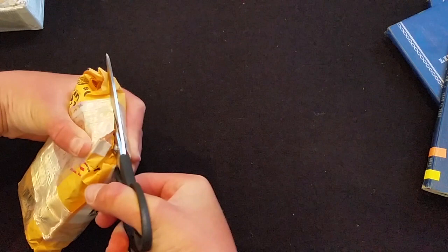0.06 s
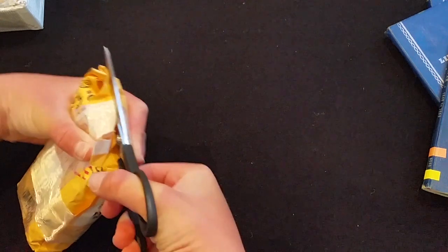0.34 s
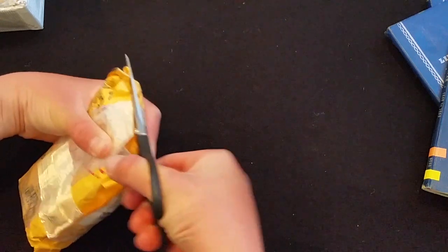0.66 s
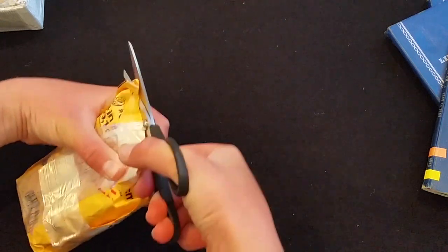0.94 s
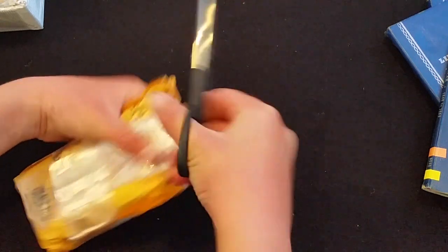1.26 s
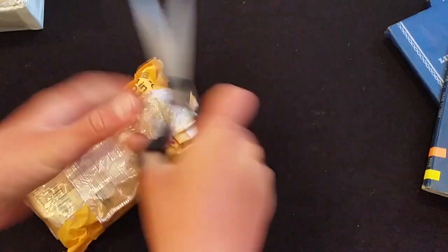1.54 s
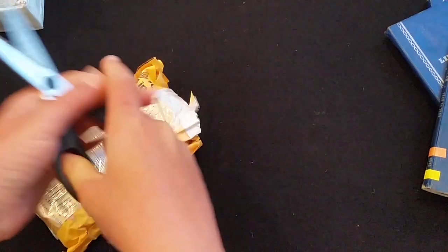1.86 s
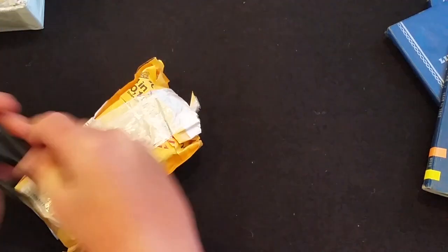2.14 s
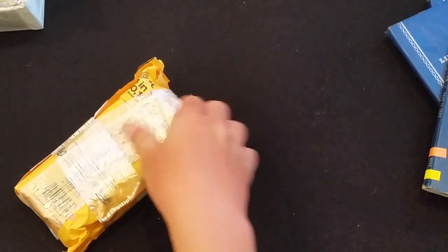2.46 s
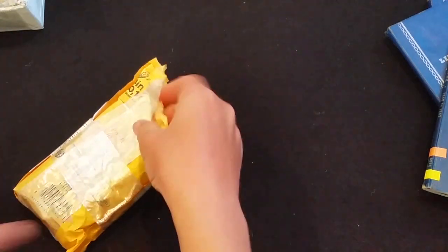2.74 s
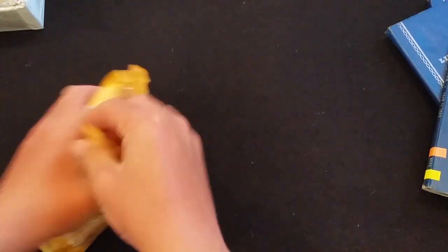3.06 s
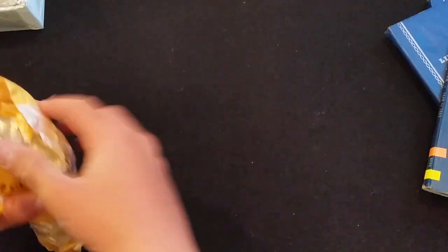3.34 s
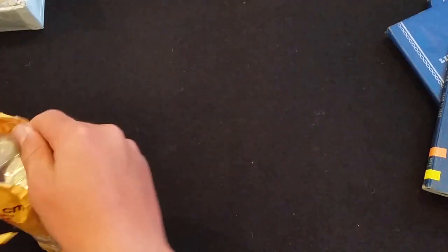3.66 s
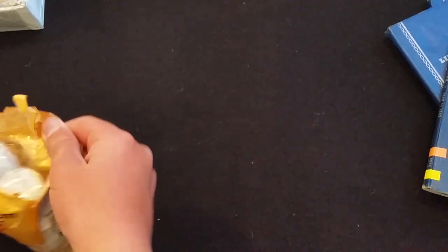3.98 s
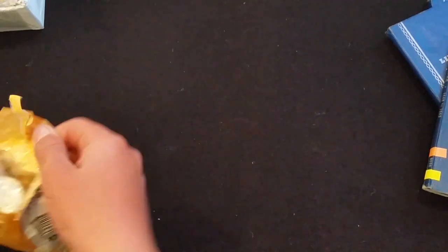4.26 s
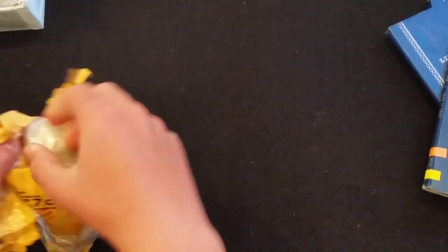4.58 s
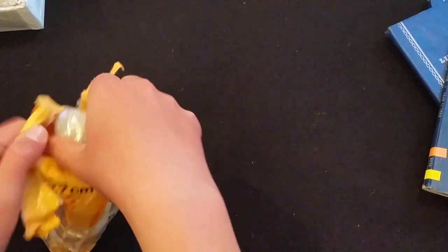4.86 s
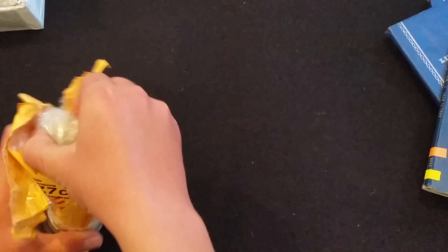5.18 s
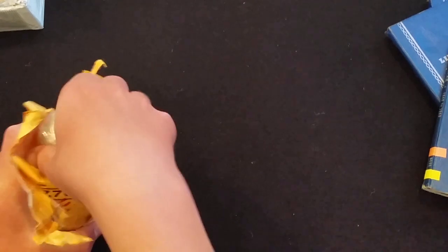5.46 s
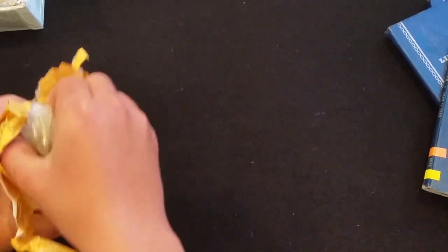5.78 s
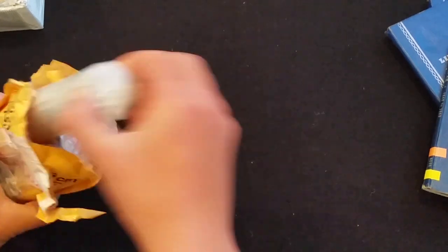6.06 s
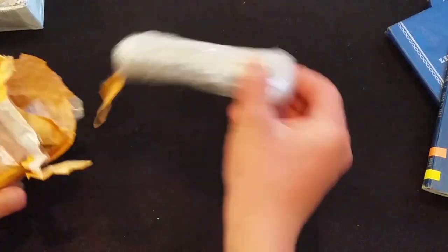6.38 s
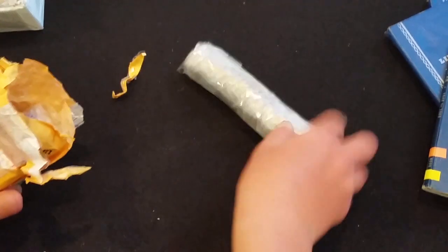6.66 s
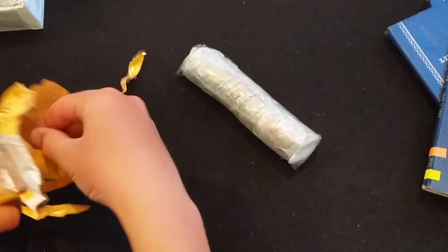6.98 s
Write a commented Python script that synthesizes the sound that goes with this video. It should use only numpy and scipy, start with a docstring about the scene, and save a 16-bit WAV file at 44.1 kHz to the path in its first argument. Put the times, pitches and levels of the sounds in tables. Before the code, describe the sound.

A packet is cut with scissors and ripped open, its paper and plastic crackling and snapping between dull bumps on a table.

```python
"""At a cloth-covered table in a small room, scissors cut a paper and plastic wrapper; hands tear it open
and lay down a wrapped roll. Creases buckle and release elastic energy as crackles and snaps, brightest
on the right. Blows and friction excite the table's modes, and this structure-borne sound reaches mainly
the left microphone, whose mount sways after heavy blows. Faint hiss and rumble lie underneath."""
import sys
import numpy as np
from scipy import signal
from scipy.fft import rfft, irfft, next_fast_len
from scipy.io import wavfile
from scipy.ndimage import uniform_filter1d, minimum_filter1d

SR = 44100
rng = np.random.default_rng(int(sys.argv[2]) if len(sys.argv) > 2 else 0)


def wav_record(signal):
    """Record a signal, one row per channel, as 16-bit PCM in the file named by sys.argv[1]."""
    frames = np.transpose(np.atleast_2d(signal))
    bounded = np.clip(frames, -1, 1)
    # unit amplitude maps onto the largest positive 16-bit level
    quanta = np.round(bounded * 32767).astype(np.int16)
    wavfile.write(sys.argv[1], SR, quanta)


N = 313974

# Noise density of the left and right channels: f/Hz, level/dB
HISS_LEFT = [(10, -57), (30, -55.5), (55, -63.5), (90, -81), (300, -80), (1200, -86.5), (1700, -81.5),
             (2200, -93.5), (2700, -90.5), (3450, -104), (4050, -80), (4900, -75), (5600, -80),
             (6400, -108), (16000, -114)]
HISS_RIGHT = [(10, -105), (55, -79), (90, -80), (250, -81), (600, -92.5), (1700, -97), (3300, -106),
              (4800, -105), (7000, -114), (16000, -110)]
# Arms shifting on the table, as when the scissors are put away: peak t/s, swell/s, fade/s, level/dB
ARM_SHIFTS = [(.55, .8, 1.5, -37), (1.75, 0.83, 1.4, -32.5), (7.05, 1, 0.55, -28.5)]
# Swings of the microphone mount: t/s, relative peak level/dB
MOUNT_SWAYS = [(1.188, -29), (1.408, -8), (1.528, -6), (2.059, -9), (4.223, -24), (5.021, -23), (5.42, -23),
               (6.616, -3), (6.779, -13.5)]
# Hands and packet sliding on the cloth: peak t/s, swell/s, fade/s, relative level/dB
SLIDES = [(.37, .2, 0.13, -55), (.52, 0.013, 0.018, -44), (1.19, .3, 0.21, -44), (1.37, 0.082, 0.3, -42),
          (2.6, 0.042, 0.17, -44), (2.768, 0.013, 0.12, -44), (3.28, 0.14, 0.28, -40),
          (3.37, 0.11, 0.079, -44), (3.85, 0.68, 0.15, -52), (4.6, 0.24, 0.45, -56),
          (5.015, 0.048, 0.15, -38), (5.7, 0.17, 0.055, -37.5), (6.01, 0.12, 0.4, -40.5),
          (6.33, 0.67, 0.76, -45.5), (7.08, 0.6, 0.26, -49.5)]
# Normal modes of the table top: f/Hz, relative level/dB, T60/s
TABLE_MODES = [(47.7, -8.5, 0.33), (67.3, -6, 0.33), (113.5, -12, 0.27), (146.4, -10, 0.22),
               (163.2, -3.5, 0.2), (196.5, -6, 0.25), (294.7, -4.5, 0.19), (326.6, -3, 0.12),
               (359, -3, 0.21), (390, -9, 0.15), (482, -12, 0.18), (530, -7, .14), (630, -11.5, 0.05),
               (758.6, -4.5, 0.048), (846, -11, 0.078), (1036, -8.5, 0.034)]
# Spectrum of the table's dense, well damped modes: f/Hz, relative level/dB
THUD_SPECTRUM = [(40, 2), (150, 7.5), (350, 1), (900, -0.5), (1300, -13.5), (2000, -29.5), (3200, -35.5),
                 (6000, -52.5)]
# Blows on the table: t/s, level before panning/dB, bass weight/dB, hardness/dB, favoured f/Hz
KNOCKS = [(0.52, -54, 6, 6, 734), (1.408, -36.5, -1, -4, 450), (1.53, -39, -4.5, -2.5, 376),
          (2.067, -40, -9, -1, 297), (2.072, -29.5, -4.5, -4.5, 280), (2.088, -37.5, -3, -21, 167),
          (2.114, -34, -7, 5, 450), (2.601, -45, 9, -18, 204), (2.756, -49, -14, 5, 740),
          (3.953, -38.5, -7, -3.5, 323), (4.158, -30.5, -11, -1.5, 505), (4.887, -58, -12, 11, 1200),
          (5.016, -47.5, -4, -14, 226), (5.38, -27, -6.5, 1.5, 310), (5.4, -26, 28.5, 7.5, 114.5),
          (5.428, -24, -7, -0.5, 320), (5.486, -37.5, 12, -2, 166), (5.966, -53.5, -10, 14, 1400),
          (6.002, -51, -13, -13, 337), (6.596, -41, -1, -13, 346), (6.631, -26, 4.5, -2, 286),
          (6.651, -33.5, 0.5, -17, 168), (6.688, -33.5, 1, -3.5, 328), (6.756, -43.5, 5.5, -20, 392)]
# The blades meeting through the last folds: t/s, peak level/dB
SNIPS = [(0.522, -31), (1.1501, -19)]
# Pulls that rip the film: peak t/s, swell/s, fade/s, level/dB
TEARS = [(3.565, .1, 0.13, -37.5), (3.83, 0.22, 0.37, -36), (4.125, 0.14, 0.1, -36),
         (4.205, 0.14, 0.029, -30.5)]
# Cuts, bends and pulls: peak t/s, swell/s, fade/s, relative film level/dB, relative paper level/dB
BENDS = [(.025, 0.29, 0.25, -46.5, -51), (.258, 0.035, 0.025, -38.5, -45), (.39, 0.11, 0.32, -44.5, -56),
         (.52, 0.011, 0.056, -36, -45.5), (.61, 0.13, 0.23, -48, -64), (.915, 0.055, 0.1, -30.5, -45),
         (1.169, 0.054, 0.079, -32, -39.5), (1.4, 0.098, 0.074, -39.5, -45.5),
         (1.488, 0.067, 0.068, -38.5, -47.5), (2.17, 0.082, 0.15, -64, -61), (2.61, 0.017, 0.076, -46, -57),
         (2.765, 0.082, 0.13, -43, -51.5), (2.9, 0.16, 0.15, -38, -43.5),
         (3.095, 0.045, 0.056, -39.5, -45.5), (3.27, 0.34, 0.14, -42, -50), (3.555, .13, 0.073, -36, -47),
         (3.83, 0.75, 0.17, -44, -50.5), (3.942, 0.076, 0.086, -35, -42), (4.088, 0.07, 0.18, -32, -41),
         (4.41, .15, 0.11, -43.5, -54), (4.66, 0.38, 0.7, -44.5, -51.5), (4.92, 0.12, 0.17, -43.5, -57),
         (5.02, 0.11, 0.099, -36, -41.5), (5.135, 0.24, 0.22, -41.5, -50), (5.39, 0.2, 0.66, -46.5, -54),
         (5.68, 0.12, 0.085, -43.5, -49.5), (6.02, 0.2, .3, -39, -42), (6.275, 0.15, 0.12, -41, -44.5),
         (6.46, 0.27, 0.22, -49.5, -54), (6.621, 0.015, 0.026, -27.5, -41), (6.67, 0.035, 0.16, -37, -43),
         (6.82, 0.27, 0.57, -55, -59), (7.06, 0.077, .3, -55, -53)]
# Spans in which a hand holds the packet: start t/s, end t/s
HELD_SPANS = [(0, 1.7), (2.61, 8)]
# Sharp snaps: creases giving way, and the click of the scissors being put down:
# t/s, relative crack level/dB, crack f/Hz, relative tick level/dB
SNAPS = [(.521, -15, 10200, -22.5), (.9545, -15.5, 11300, -35), (1.1501, -7.5, 9600, -19),
         (2.1144, -34, 10900, -40), (2.79, -42, 13700, -28), (2.8152, -20, 11300, -26.5),
         (2.901, -24, 11600, -21), (3.044, -26, 12600, -35), (3.092, -22, 10900, -27.5),
         (3.1939, -19, 9800, -47), (3.417, -43, 14500, -52), (3.5667, -16, 12000, -50),
         (3.8104, -18, 12400, -34), (3.8424, -21.5, 10900, -27), (3.9197, -16.5, 11000, -30),
         (3.943, -18, 13000, -21), (4.0695, -19, 13600, -26), (4.0976, -11, 9700, -40),
         (4.3068, -26, 11180, -38), (4.3233, -20.5, 10000, -36), (4.4181, -17.5, 14000, -51),
         (4.563, -31, 10100, -26.5), (4.74, -25, 12100, -30.5), (4.8338, -21, 10140, -50),
         (4.8487, -17.5, 10600, -45), (5.0164, -18, 11700, -16.5), (5.0236, -16, 11500, -24),
         (5.367, -19.5, 10800, -29), (5.913, -24.5, 10600, -32), (5.9665, -31, 10300, -19.5),
         (6.0045, -7.5, 11100, -21.5), (6.0215, -24, 11700, -26), (6.0496, -19, 10300, -45),
         (6.1808, -11, 13000, -35), (6.2602, -22, 11900, -51), (6.2977, -27, 10500, -27.5),
         (6.6286, -19, 9140, -25), (6.667, -15, 10100, -34), (6.719, -25, 11900, -31),
         (7.061, -29, 13900, -29)]
# Spectra of the blades and the wrapper: f/Hz, relative level/dB
BITE_SPECTRUM = [(300, -10), (1000, 0), (1500, -5), (2100, 9), (2800, -7), (3800, 2), (5000, -8),
                 (6200, -22), (9000, -31)]  # blades meeting
RIP_SPECTRUM = [(4000, -39), (7500, -8), (9500, 3), (12000, -9.5), (14500, 2), (16000, -14)]  # film ripping
FILM_SPECTRUM = [(3000, -44), (6800, -17.5), (8000, -7.5), (9400, 4.5), (11500, 2), (13500, 0.5),
                 (15500, -2.5), (17000, -48)]  # film crackling
PAPER_SPECTRUM = [(100, -15.5), (300, -0.5), (900, 0.5), (1700, 0), (2500, -2), (3200, -8.5), (4200, -1.5),
                  (6000, -7), (9000, -56)]  # paper rustling
CRACK_SPECTRUM = [(2000, -54), (4500, -31.5), (6800, -16), (9000, 2), (11500, 1), (13500, 1), (16000, -8)]  # one loud crack of film
TICK_SPECTRUM = [(150, -7.5), (500, -3.5), (950, 8), (1400, -2), (2000, -3.5), (2900, -11.5), (3900, -7),
                 (5200, -9), (7000, -29.5)]  # one tick of stiff paper
# Response to the film at the left microphone, relative to the right: f/Hz, gain/dB
OFF_AXIS_RESPONSE = [(4000, 25), (7000, -2), (9500, -23.5), (11500, -14.5), (13500, -6), (15500, 7)]

FILM_RING_S, PAPER_RING_S = .00045, .0013  # decay time constants of a crease


def amp(db):
    """Amplitude ratio of a level in decibels."""
    return 10 ** (np.asarray(db) / 20)


def unit(x):
    """Normalisation to unit rms."""
    return x / np.sqrt(np.mean(x ** 2) + 1e-20)


def level_at(spectrum, hz):
    """Interpolation of (f/Hz, level/dB) points on a logarithmic frequency axis."""
    f, db = np.transpose(spectrum)
    return np.interp(np.log(hz + 1), np.log(f + 1), db)


def colour(x, spectrum):
    """Minimum-phase filter: the phase follows from the Hilbert transform of the log gain."""
    size = next_fast_len(x.shape[-1] + 4096)
    log_gain = level_at(spectrum, abs(np.fft.fftfreq(size, 1 / SR))) * np.log(10) / 20
    response = np.exp(np.conj(signal.hilbert(log_gain)))[:size // 2 + 1]
    return irfft(rfft(x, size) * response, size)[..., :x.shape[-1]]


def add(mix, start_s, sound):
    """Superposition of a sound on the mix, in place."""
    part = mix[:, max(round(start_s * SR), 0):][:, :sound.shape[-1]]
    part += sound[..., :part.shape[-1]]


def swell(peak_s, swell_s, fade_s, db, range_db=20.5):
    """Exponential growth and decay, covering range_db in each of swell_s and fade_s."""
    t = np.arange(N) / SR - peak_s
    return amp(db - range_db * np.minimum(np.maximum(-t / swell_s, t / fade_s), 10))


def gestures(rows):
    """Incoherent addition: overlapping swells sum in power."""
    return np.sqrt(sum(swell(*row) ** 2 for row in rows))


def wander(corner_hz):
    """Random modulation: low-passed noise of unit rms."""
    lowpass = 1 / (1 + (np.fft.rfftfreq(N, 1 / SR) / corner_hz) ** 4)
    return unit(irfft(rfft(rng.standard_normal(N)) * lowpass, N))


def slips(per_s, spread_db):
    """Poisson process of impulses: many small, a few large."""
    size = amp(spread_db * np.minimum(rng.exponential(1, N), 4))
    return size * rng.choice([-1, 1], N) * (rng.random(N) < per_s / SR)


def background():
    """Noise floor: steady channel hiss, and structure-borne rumble from arms leaning on the table."""
    left, right = rng.standard_normal((2, N)) * np.sqrt(SR / 2)  # unit power per hertz
    hiss = np.array([colour(left, HISS_LEFT), colour(right, HISS_RIGHT)])
    rumble_spectrum = [(8, -20), (27, 5.5), (40, -15), (62, -11), (100, -33), (300, -59)]
    rumble = unit(colour(rng.standard_normal((2, N)), rumble_spectrum))
    leaning = np.hypot(amp(-54), gestures(ARM_SHIFTS))
    return hiss + rumble * leaning * amp([[0], [-13]])


def room(x, t60, wet_db):
    """Reverberation: sparse, exponentially decaying reflections follow the direct sound."""
    t = np.arange(SR // 2) / SR
    taps = rng.standard_normal((2, len(t))) * (rng.random((2, len(t))) < 3000 / SR)
    taps *= (t > .003) * amp(-60 * t / t60)
    taps /= np.linalg.norm(taps, axis=1, keepdims=True)
    return x + amp(wet_db) * signal.fftconvolve(x, taps, axes=1)[:, :N]


def mount_sway(hz=28.24, rise_s=0.035, t60=0.46):
    """Damped oscillator: the springy microphone mount swings below the table's lowest mode."""
    out, t = np.zeros((2, N)), np.arange(SR) / SR
    swing = np.sin(2 * np.pi * hz * t) * (1 - np.exp(-(t / rise_s) ** 3)) * amp(-60 * t / t60)
    for s, db in MOUNT_SWAYS:
        add(out, s, amp(db) * swing / abs(swing).max() * amp([[-1], [-28]]))
    return out


def table_ring(drive, scatter_db):
    """Modal superposition: damped sinusoids weighted by the spectrum of the driving force."""
    t = np.arange(SR // 2) / SR
    hz, db, t60 = np.transpose(TABLE_MODES)[:, :, None]
    share = amp(db + level_at(drive, hz) + scatter_db * rng.standard_normal(hz.shape))
    share *= rng.choice([-1, 1], hz.shape)
    return (share * amp(-60 * t / t60) * np.sin(2 * np.pi * hz * t)).sum(0)


def sliding():
    """Stick-slip friction: small slips on the cloth drive the table's modes to a murmur."""
    grit = np.array([slips(1500, spread_db=3.5), slips(1700, spread_db=3)])
    modes = table_ring([(60, -2), (150, -6.5), (330, 3), (500, -2), (900, 3)], scatter_db=0.5)
    ring = signal.oaconvolve(grit[0], modes)[:N]
    rub = unit(ring) * amp([[2], [-11]]) + unit(colour(grit, THUD_SPECTRUM)) * amp([[-1], [-6]])
    return rub * gestures(SLIDES)


def knocks(thud_t60=0.072, attack_s=0.00029, light_db=-47, heavy_db=-39):
    """Impact excitation: each blow rings the table, and its dense, well damped modes give a thud."""
    out, t = np.zeros((2, N)), np.arange(SR // 2) / SR
    for s, db, weight_db, hardness_db, note_hz in KNOCKS:
        drive = [(130, weight_db), (290, 0), (500, 0), (850, hardness_db)]
        burst = rng.standard_normal((2, len(t))) * amp(-60 * t / thud_t60)
        thud = unit(colour(colour(burst, THUD_SPECTRUM), drive))
        ring = unit(table_ring(drive, scatter_db=1))
        blow = (ring + amp(-4) * thud) * (1 - np.exp(-t / attack_s))
        # the point of impact favours the modes near one note
        blow = unit(colour(blow, [(note_hz / 1.07, 0), (note_hz, 6), (note_hz * 1.26, 0)]))
        # light taps reach both sides by air; heavy blows pass through the table to the left
        left_db = np.interp(db, [light_db, heavy_db], [-1, 19.5])
        sides = 2 * amp([[left_db], [0]]) / (1 + amp(left_db))
        add(out, s, amp(db) * sides * blow)
    return out


def crease(hz, ring_s, ring_db):
    """Buckling transient: a decaying noise burst of unit energy with one resonance."""
    t = np.arange(512) / SR
    burst = rng.standard_normal((2, len(t))) * np.exp(-t / ring_s)
    burst = colour(burst, [(hz / 1.2, 0), (hz, ring_db), (hz * 1.2, 0)])
    return burst / np.linalg.norm(burst, axis=1, keepdims=True)


def crackle(low_hz, high_hz, per_s, spread_db, ring_s, clump_db, count=14):
    """Shot noise: creases slip independently, and a fluctuating gain groups them into clumps."""
    grains = np.zeros((2, N))
    for hz in np.geomspace(low_hz, high_hz, count):
        impulses = slips(per_s / count, spread_db)[None]
        grains += signal.oaconvolve(impulses, crease(hz, ring_s, ring_db=7), axes=1)[:, :N]
    return grains * amp(clump_db * wander(corner_hz=52))


def off_axis(x):
    """Directivity: the left microphone faces away from the film and receives a duller sound."""
    return np.array([colour(x[0], OFF_AXIS_RESPONSE), x[1]])


def snips(hz=3900, ring_s=0.0021):
    """Hard impact: steel meets steel through the paper in a short bite."""
    out = np.zeros((2, N))
    for s, db in SNIPS:
        bite = colour(crease(hz, ring_s, ring_db=6), BITE_SPECTRUM)
        add(out, s - .0005, amp(db) * bite / abs(bite).max())
    return out


def tearing():
    """Intermittent fracture: a tear runs through the film in quick, bright jerks."""
    jerks = crackle(9200, 16000, per_s=2900, spread_db=4.5, ring_s=0.00034, clump_db=3)
    return off_axis(unit(colour(jerks, RIP_SPECTRUM))) * gestures(TEARS)


def bending(grip_s=0.058):
    """Strain sets the film and paper gains: high in bends, low when held, least as the wrapper relaxes."""
    t = np.arange(N) / SR
    held = sum(1. * ((t >= start) & (t < end)) for start, end in HELD_SPANS)
    held = uniform_filter1d(held, int(grip_s * SR))
    film_floor = amp(np.interp(held, [0, 1], [-94, -70]))
    paper_floor = amp(np.interp(held, [0, 1], [-74, -61]))
    film = gestures((s, rise, fade, db) for s, rise, fade, db, _ in BENDS)
    paper = gestures((s, rise, fade, db) for s, rise, fade, _, db in BENDS)
    return np.hypot(film, film_floor), np.hypot(paper, paper_floor)


def crumpling():
    """Buckling of thin sheets: film fizzes, paper rustles, and sparse sharper creases stand out."""
    film_gain, paper_gain = bending()
    fizz = crackle(8800, 10900, per_s=4500, spread_db=1.5, ring_s=FILM_RING_S, clump_db=2.5, count=24)
    fizz = unit(colour(fizz, FILM_SPECTRUM)) * film_gain * amp(2)
    ticks = crackle(8500, 15000, per_s=60, spread_db=2.8, ring_s=.00025, clump_db=1)
    # a single crease keeps much of its size however gently the film is bent
    ticks = unit(colour(ticks, FILM_SPECTRUM)) * film_gain ** .75 * amp(-12)
    rustle = crackle(800, 3750, per_s=1600, spread_db=4, ring_s=PAPER_RING_S, clump_db=1.94)
    rustle = unit(colour(rustle, PAPER_SPECTRUM)) * paper_gain * amp([[0], [1.5]])
    return off_axis(fizz + ticks) + rustle


def snaps(tick_range_hz=(814, 3800)):
    """Impulsive excitation: a crease yields or the scissors land, with a bright crack and hollow tick."""
    out = np.zeros((2, N))
    for s, crack_db, crack_hz, tick_db in SNAPS:
        crack = off_axis(unit(colour(crease(crack_hz, FILM_RING_S, ring_db=10), CRACK_SPECTRUM)))
        tick_hz = np.exp(rng.uniform(*np.log(tick_range_hz)))
        tick = unit(colour(crease(tick_hz, PAPER_RING_S, ring_db=2.5), TICK_SPECTRUM))
        add(out, s - .0002, crack * amp(crack_db - 12) + tick * amp(tick_db - 14.5))
    return out


def scene():
    """Linear superposition of the wrapper's airborne sound, the vibrations and the noise floor."""
    crackling = room(crumpling() + tearing(), t60=0.089, wet_db=-7.5)
    transients = room(snaps() + snips(), t60=0.2, wet_db=-10)
    return crackling + transients + knocks() + mount_sway() + sliding() + background()


def record(dry, limiter_s=.004, cutoff_hz=16000):
    """Peak limiting turns down whatever exceeds full scale; a low-pass filter then limits the band."""
    size = int(limiter_s * SR)
    gain = minimum_filter1d(1 / np.maximum(abs(dry), 1), size, axis=1)
    gain = uniform_filter1d(gain, size, axis=1)
    lowpass = signal.firwin(255, cutoff_hz, window=("kaiser", 8), fs=SR)
    return signal.oaconvolve(dry * gain, lowpass[None], "same")


dry = scene()
out = record(dry)
wav_record(out)
```